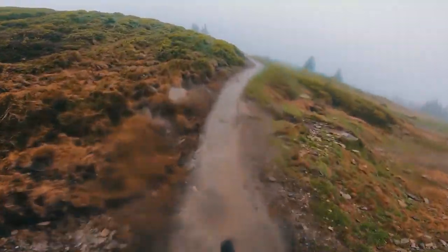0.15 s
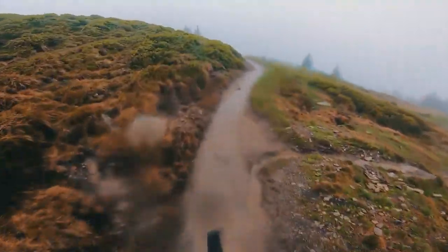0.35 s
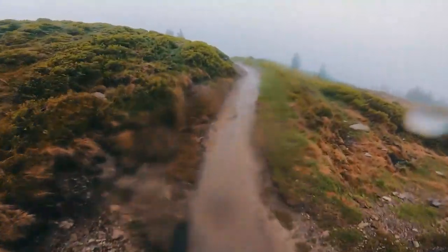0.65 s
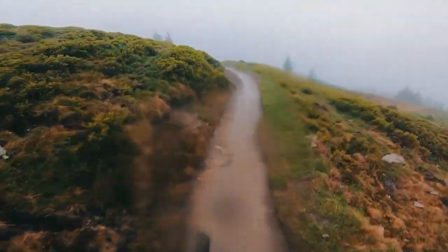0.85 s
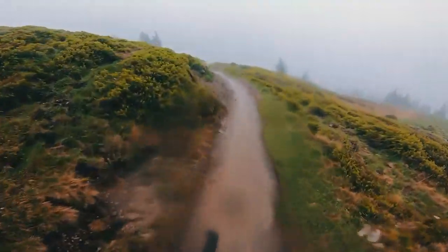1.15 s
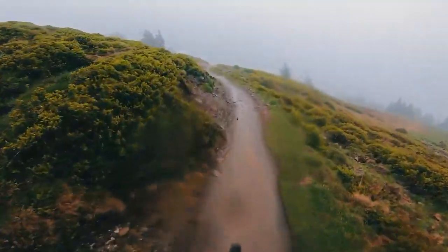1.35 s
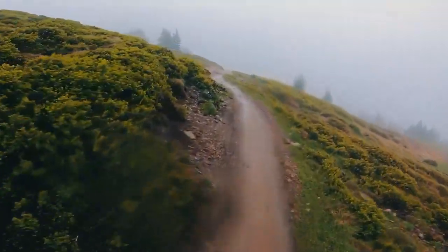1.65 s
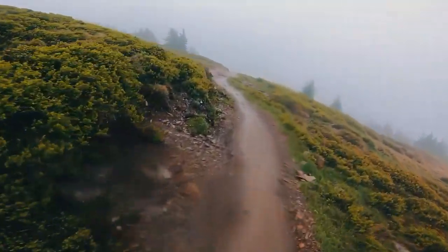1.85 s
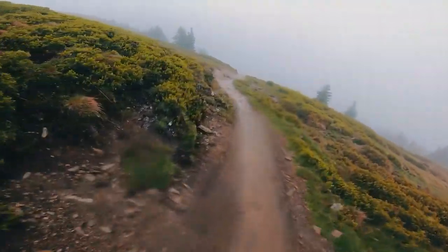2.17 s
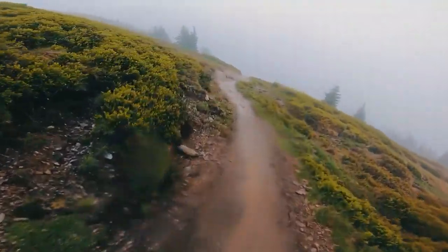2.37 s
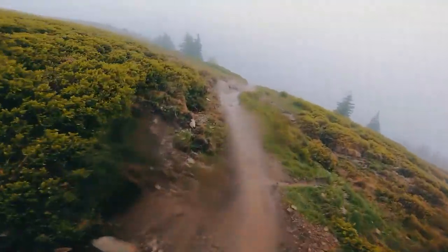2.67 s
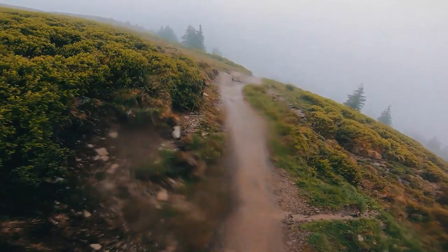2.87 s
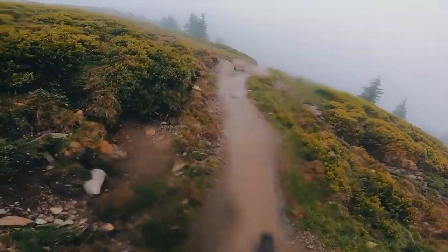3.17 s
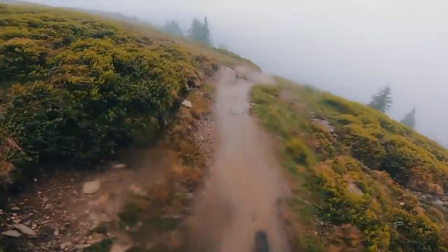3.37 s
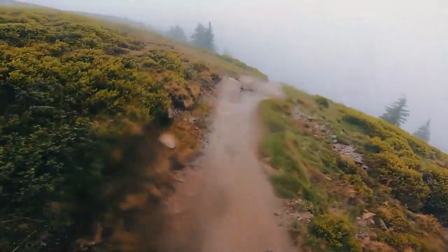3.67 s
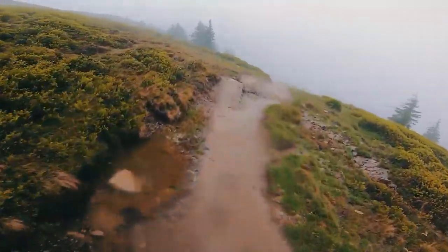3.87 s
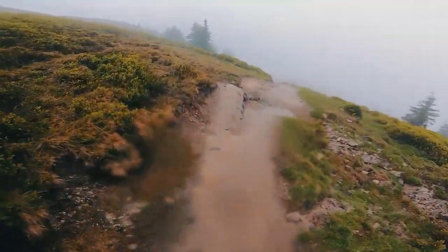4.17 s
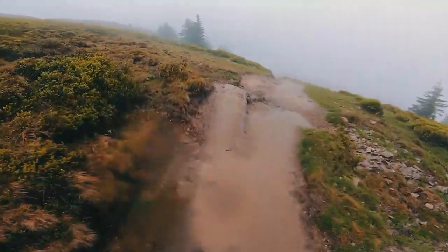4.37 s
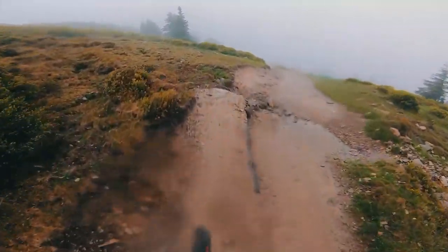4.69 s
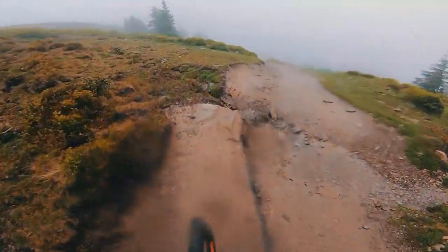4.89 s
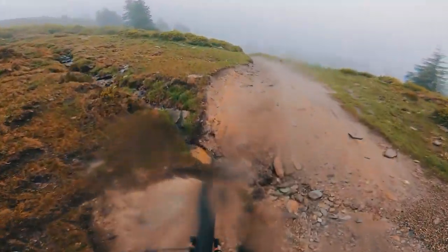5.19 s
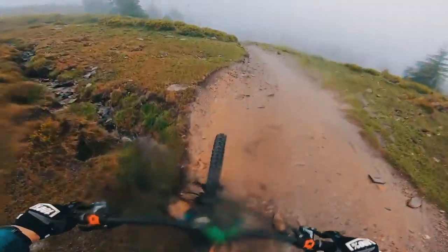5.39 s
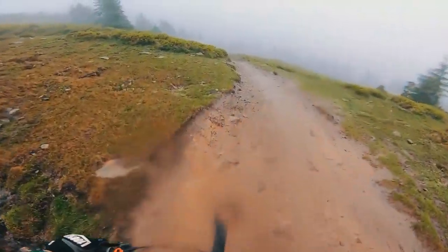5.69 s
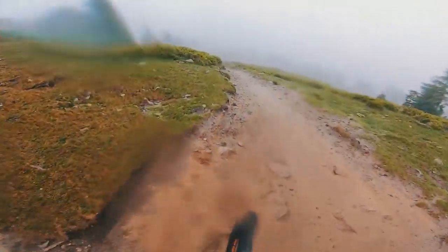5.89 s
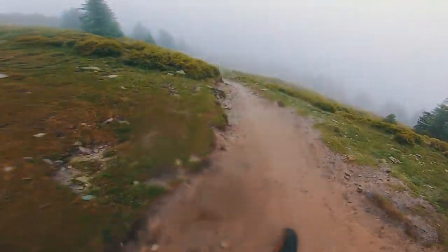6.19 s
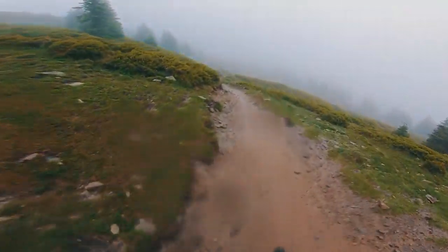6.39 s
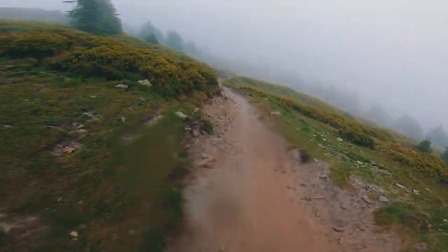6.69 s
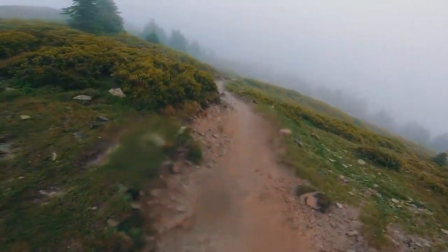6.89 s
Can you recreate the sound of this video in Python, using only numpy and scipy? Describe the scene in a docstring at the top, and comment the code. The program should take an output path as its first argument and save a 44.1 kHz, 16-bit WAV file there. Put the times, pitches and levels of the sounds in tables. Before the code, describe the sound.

A mountain bike coasts down a wet trail, heard from a small microphone riding along. The tyres churn mud loudly at first, then settle into a hiss of spray under gusty wind rumble. Drops and grit tick on the microphone housing throughout. A thin, breathy whistle comes and goes over a faint freewheel whirr. Bumps make the bike thud and knock, most heavily in a cluster near the end.

```python
"""A mountain bike coasts down a wet trail, its tyres churning mud and throwing hissing spray.
Wind buffets the opening of a small microphone in a splash-proof housing. Bumps make the frame
thud and knock, and drops and grit tick on the housing. Behind these are a hollow whistle in
the spray, the whirr of the freewheel and one ping from a spoke. Mud, spray, wind, whistle
and whirr are shaped noise; thuds, ticks and the ping are short, fading tones."""
import sys
import numpy as np
from scipy import signal
from scipy.fft import rfft, irfft, next_fast_len
from scipy.io import wavfile

SR = 44100
rng = np.random.default_rng(int(sys.argv[2]) if len(sys.argv) > 2 else 0)


def waveform_to_disk(signal):
    """Save audio, clipped to [-1, 1], as 16-bit WAV at the path in sys.argv[1]."""
    frames = np.transpose(np.atleast_2d(signal))
    scaled = np.clip(frames, -1, 1) * 32767
    samples = np.round(scaled).astype(np.int16)
    wavfile.write(sys.argv[1], SR, samples)


N = 310905

# Churned mud and thrown water between bumps. Each row: time in seconds, level in dB.
MUD_LEVELS = [(0.0, -26.5), (0.29, -27), (0.32, -35), (0.39, -36), (0.44, -29), (0.59, -24), (0.64, -31),
              (0.76, -43), (1.1, -45), (1.79, -44), (2.81, -50), (3.4, -47.5), (3.93, -52.5), (4.1, -46),
              (4.65, -49.5), (4.85, -41.5), (5.3, -45.5), (5.9, -59.5), (6.36, -46), (7.05, -52.5)]
SPRAY_LEVELS = [(0.0, -38), (0.82, -37.5), (0.9, -41), (1.49, -43), (1.88, -42), (3.3, -40.5), (3.9, -44),
                (4.03, -40.5), (4.15, -42), (4.27, -39), (4.36, -45.5), (4.48, -42), (5.12, -46),
                (5.36, -37), (5.46, -39.5), (5.8, -47.5), (6.05, -36), (6.22, -42.5), (6.36, -40),
                (7.05, -41)]
# The tyre knobs hum on firmer ground. Each row: time of the peak in seconds, level in dB.
TREAD_SWELLS = [(3.75, -39), (3.87, -42.5), (4.13, -36.5)]
# Wind between bumps. Each row: time in seconds, rumble level in dB, flutter level in dB.
WIND_LEVELS = [(0.0, -24, -31.5), (0.25, -22, -31), (0.33, -28, -33), (0.82, -22.5, -34), (0.98, -39, -39),
               (1.08, -37, -38.5), (1.45, -36, -45.5), (1.63, -33, -34), (1.9, -38, -31),
               (2.06, -36, -33.5), (2.32, -31, -37), (3.24, -35.5, -40), (3.96, -41.5, -45.5),
               (4.63, -35, -42), (4.7, -33, -29.5), (4.9, -36, -30.5), (5.1, -30, -30), (5.4, -31, -26),
               (5.46, -32, -42), (5.93, -46, -45), (6.2, -34.5, -36), (7.05, -31, -44)]
# The tone colour of mud, spray and wind. Each row: frequency in Hz, gain in dB.
MUD_SPECTRUM = [(200, -21), (330, 2.5), (500, 5), (680, 1), (900, -3), (1350, -6), (1550, -14), (2200, -45),
                (3000, -54)]
SPRAY_SPECTRUM = [(300, -45), (550, -4), (1000, 2), (1330, 4), (1520, -1), (2100, -0.5), (2750, -4.5),
                  (3050, -12), (3600, -18.5), (4000, -24.5), (5200, -32), (5900, -35), (8000, -46),
                  (10700, -55)]
RUMBLE_SPECTRUM = [(20, 0.5), (40, 0), (66, 0), (110, -7), (200, -27.5), (500, -36.5)]
FLUTTER_SPECTRUM = [(70, -1), (120, 2.5), (200, -2.5), (280, -4), (400, -11.5), (800, -45)]
# The wheel hits a bump. Each row: time of the peak in seconds, rumble, flutter and mud levels in dB,
# fade in dB per second.
BUMP_SWELLS = [(0.139, -34, -38, -26, 253), (0.28, -31, -44, -22.5, 255), (0.85, -37, -41, -34, 260),
               (0.958, -23, -49, -34.5, 303), (1.98, -21.5, -43, -68, 202), (3.34, -30, -34, -60, 103),
               (3.552, -22, -28, -42.5, 163), (4.06, -37, -34, -39.5, 133), (4.26, -28, -30.5, -53, 136),
               (4.478, -33.5, -33, -47, 114), (5.525, -21.5, -26.5, -31, 82), (5.585, -30, -19.5, -30, 410),
               (5.69, -28.5, -30.5, -40, 35), (5.996, -32, -32, -33, 311), (6.66, -23.5, -43, -47, 144)]
# Stones and roots jolt the frame. Each row: start in seconds, level in dB, pitch in Hz.
FRAME_THUDS = [(0.8, -19, 70), (1.14, -19.5, 82), (3.549, -24, 60.3), (4.061, -19.5, 89), (4.68, -26, 89.5),
               (4.736, -23, 68.5), (5.105, -17.5, 185), (5.133, -18, 126), (5.211, -14, 130),
               (5.502, -15, 79), (5.519, -14, 89), (5.564, -15, 97), (5.68, -25, 75), (5.976, -11.5, 59.6),
               (6.171, -20.5, 95)]
# Frame and chain knock. Each row: start in seconds, level in dB, seconds to fade by 60 dB.
FRAME_KNOCKS = [(0.423, -23, 0.055), (0.845, -21, 0.038), (2.036, -17.5, 0.029), (3.333, -19, 0.092),
                (3.453, -17, 0.035), (4.061, -24.5, 0.04), (4.216, -15.5, 0.034), (4.226, -16, 0.06),
                (4.234, -20, 0.062), (4.414, -22, 0.038), (4.797, -24, 0.035), (5.371, -22.5, 0.046),
                (5.378, -12.5, 0.023), (5.387, -20, 0.02), (5.415, -15.5, 0.034), (5.417, -16, 0.034),
                (5.496, -22, 0.043), (5.559, -30, 0.029), (5.878, -13.5, 0.027), (5.97, -19, 0.092),
                (5.991, -17, 0.06), (6.008, -24, 0.047), (6.047, -18, 0.073)]
# The ways the frame rings. Each row: frequency in Hz, width in Hz, gain in dB.
FRAME_RINGS = [(840, 560, 2.5), (1245, 130, 6.5), (1700, 150, -5.5)]
# Drops and grit hit the housing. Each row: start in seconds, level in dB,
# extra dB for the dull ring, extra dB for the sharp ring.
LOUD_DROPS = [(0.0444, -34, -4, -2), (0.0804, -38, -1, -6), (0.132, -35, 11, -1), (0.1835, -46, -2, -2),
              (0.214, -38, 9, -5), (0.2815, -31, 6.5, -3), (0.352, -39, 11, -17), (0.41, -39, 5.2, -10),
              (0.436, -36, -3, 1), (0.542, -39, 3, 4), (0.5586, -37, 6, 0), (0.5861, -37.5, 12, 1),
              (0.645, -36.5, 12.5, -2), (0.708, -32.5, -1, -7), (0.776, -42, -2, 4),
              (0.9212, -38.5, 15, -4), (1.125, -38, 5.2, -6), (1.1373, -32.5, 6, -5),
              (1.3503, -31, 2.5, -15), (1.5389, -39, 4, -2), (1.5785, -42, 13, -10), (1.5932, -23, 1, -0.5),
              (1.8542, -41, 9.5, 7), (1.937, -39, 9, -11), (1.984, -40, -6, -2), (2.0392, -19.5, 0.5, -37),
              (2.06, -32, 0, -14), (2.5413, -33, 10.5, -27), (2.6616, -34, -5, -6), (2.701, -29.5, -4, -14),
              (2.735, -33.5, 2, -15), (2.761, -40, 5, 2), (2.82, -43.5, 14, -13), (2.9724, -42, -2, -3),
              (3.007, -39, 10, -16), (3.0445, -40, 5, -3), (3.2778, -42, 11, -4), (3.3526, -34, 0, -6),
              (3.4532, -32.5, 8, -6), (3.621, -39, -3, -19), (3.7487, -31, 8, -3), (3.909, -35, -1, -10),
              (4.1306, -36.5, 16.5, -1), (4.1737, -36, 7, -12), (4.2184, -37, 1, -4), (4.2348, -39, 5, -4),
              (4.399, -35.5, -1, -15), (4.486, -36, -2, -8), (4.5986, -40, 12, -3),
              (4.6763, -35.5, -8, -5.5), (4.999, -44, 12.5, -15), (5.0334, -41.5, 9, 2),
              (5.096, -42, 0, -16), (5.1584, -50, -2, 3), (5.193, -46, 2, 0), (5.2011, -39, 11, -10),
              (5.373, -30.5, 4, -12), (5.5888, -40, 14.5, -3), (5.781, -42.5, -2, -9), (5.876, -41, 14, -3),
              (5.9285, -39.5, 17, 2), (6.0375, -35, 17, 1), (6.065, -33, 9, -8), (6.1684, -44, 4, -2),
              (6.2234, -40, 11.5, 2), (6.3806, -38, -3, -2), (6.42, -40, 2, -10), (6.5084, -31.5, 7.5, -7),
              (6.6194, -39, 1, -8), (6.676, -38.5, 12.5, -4), (6.6955, -38, 8, 1), (7.0185, -39, 12.5, -19)]
# Small drops. Each row: time in seconds, typical drops per second, typical level in dB.
SMALL_DROPS = [(0, 220, -49.5), (.9, 100, -54), (1.5, 90, -52.5), (3.4, 50, -53), (5.2, 45, -49),
               (7.05, 90, -57)]
# The ways the housing rings. Each row: frequency in Hz, seconds to reach its peak.
HOUSING_RINGS = [(2750, 0.00038), (3650, 0.00051), (4750, 0.0003), (7800, 0.00029)]
# Whistles in the spray. Each row: start in seconds, first and last pitch in Hz, level in dB,
# fade in dB per second (its sign is ignored), extra dB for the upper tone.
WHISTLE_NOTES = [(1.584, 2410, 2440, -41.5, 11, -4), (1.801, 2375, 2400, -44, 29, -4),
                 (2.03, 2390, 2050, -44.5, 17, -1.5), (2.5, 2400, 2580, -52, 3, -13),
                 (3.5, 2120, 1890, -65, -3, -13), (3.98, 1720, 1970, -44, 27, -20),
                 (5.2, 2080, 2370, -50.5, 34, 4), (6.04, 2700, 2570, -50.5, 15, -21),
                 (6.29, 1720, 1740, -41.5, -2, -14), (6.47, 1920, 1890, -44, 32, -18)]
# How loud the freewheel whirrs. Each row: time in seconds, level in dB.
FREEWHEEL_LEVELS = [(0.0, -71), (0.47, -66), (1.16, -73.5), (2.04, -70.5), (3.3, -69), (3.55, -75),
                    (4.04, -70), (4.24, -91), (4.5, -73.5), (5.2, -81), (5.225, -66), (5.45, -66),
                    (5.9, -79), (6.13, -73), (7.05, -73)]
# Where the whirr sits. Each row: frequency in Hz, width in Hz, gain in dB.
FREEWHEEL_BANDS = [(5100, 670, -7.5), (6540, 600, -3.5), (10530, 1460, -7)]
# A spoke rings. The values: start in seconds, pitch in Hz, level in dB, seconds to fade by 60 dB.
SPOKE_PING = (1.599, 5020, -49, .06)


def tyres(gust):
    """Tyre knobs churn the mud and hum faintly; thrown water hisses and splashes at each knock."""
    churn = patchy_noise(MUD_SPECTRUM, lumps_db=2.0, lumps_hz=54, flicker_db=0.7)
    spray = patchy_noise(SPRAY_SPECTRUM, lumps_db=2.0, lumps_hz=88, flicker_db=1.76)
    hum = pitched_noise(rng.standard_normal(N), hz=np.full(N, 249.2), width_hz=20.3)
    knock_s, knock_db, _ = np.transpose(FRAME_KNOCKS)
    splash = swells(knock_s, knock_db - 23, rise_db_per_s=2500, fade_db_per_s=455)
    firm_ground = swells(*np.transpose(TREAD_SWELLS), rise_db_per_s=180, fade_db_per_s=115)
    # hypot adds two gains by their power
    churn_gain = np.hypot(from_db(curves(MUD_LEVELS)[0]), bumps(column=3))
    spray_gain = np.hypot(from_db(curves(SPRAY_LEVELS)[0]), splash)
    hum_gain = np.hypot(from_db(-51.5), firm_ground)
    return gust * churn_gain * churn + spray_gain * spray + hum_gain * hum


def wind():
    """Air swirls over the microphone: a deep rumble and a higher flutter, both swelling at bumps."""
    rumble_db, flutter_db = curves(WIND_LEVELS)
    rumble = patchy_noise(RUMBLE_SPECTRUM, lumps_db=1.0, lumps_hz=73, flicker_db=4.5)
    flutter = patchy_noise(FLUTTER_SPECTRUM, lumps_db=2.0, lumps_hz=46, flicker_db=2.0)
    rumble_gain = np.hypot(from_db(rumble_db), bumps(column=1))
    flutter_gain = np.hypot(from_db(flutter_db), bumps(column=2))
    return rumble_gain * rumble + flutter_gain * flutter


def bumps(column):
    """Each bump briefly lifts the gain of a layer: column 1 is rumble, 2 flutter, 3 mud."""
    columns = np.transpose(BUMP_SWELLS)
    return swells(columns[0], columns[column], rise_db_per_s=207, fade_db_per_s=columns[-1])


def thuds():
    """Each jolt gives the frame one deep push that is gone in about two cycles."""
    t = np.arange(SR // 8) / SR
    out = np.zeros(N + len(t))
    for start_s, level_db, hz in FRAME_THUDS:
        age = hz * t / 0.31  # the push is strongest after 0.31 cycles
        push = age * np.exp(1 - age)
        i = int(start_s * SR)
        out[i:i + len(t)] -= from_db(level_db) * push * np.cos(2 * np.pi * hz * t)
    return out[:N]


def knocks():
    """Each knock is a short, fading clatter of contacts that makes the frame ring."""
    out, t = np.zeros(N), np.arange(SR // 4) / SR
    attack = 1 - np.exp(-t / 0.0011)
    for start_s, level_db, fade_s in FRAME_KNOCKS:
        contacts_db = np.r_[7, 5 * rng.standard_normal(len(t) // 40)]  # uneven, the first one firm
        grit = rng.standard_normal(len(t)) * from_db(contacts_db.repeat(40)[:len(t)])
        clatter = grit * attack * from_db(-60 * t / fade_s)
        strengths = from_db(rng.normal(0, 2.6, len(FRAME_RINGS)))
        ring = sum(strength * from_db(gain_db) * signal.lfilter(*resonance(hz, width_hz), clatter)
                   for strength, (hz, width_hz, gain_db) in zip(strengths, FRAME_RINGS))
        i = int(start_s * SR)
        out[i:i + len(t)] += from_db(level_db) * ring / np.abs(ring).max()
    return muffle(out, above_hz=2300)


def drops():
    """Loud drops hit the housing at set times; small ones land by chance, in flurries."""
    tries_per_s, tick_samples = 300, 300
    count = int(N / SR * tries_per_s)
    when, chance, size, dull, sharp = rng.random((count, 5)).T
    starts_s = when * N / SR
    times_s, per_s, typical_db = np.transpose(SMALL_DROPS)
    small_db = np.interp(starts_s, times_s, typical_db) - 5.5 * np.log(size + .12)
    small = np.c_[starts_s, small_db, 12 * dull - 4, 20 * sharp - 17]
    flurry = wobble(depth_db=3.5, speed_hz=9)[(when * N).astype(int)]
    lands = chance * tries_per_s < np.interp(starts_s, times_s, per_s) * flurry
    out, t = np.zeros(N + tick_samples), np.arange(tick_samples) / SR
    quirks = rng.uniform(-1, 1, (count + len(LOUD_DROPS), 5))
    for (start_s, level_db, dull_db, sharp_db), quirk in zip([*LOUD_DROPS, *small[lands]], quirks):
        i = int(start_s * SR)
        out[i:i + len(t)] += from_db(level_db) * tick(t, dull_db, sharp_db, quirk[0], quirk[1:])
    # the housing swallows one band of treble
    swallowed = signal.lfilter(*resonance(hz=5860, width_hz=630), out + 1e-18)
    return (out - swallowed)[:N]


def tick(t, dull_db, sharp_db, brightness, detunes):
    """One drop rings the housing for a few cycles, each ring off pitch by up to 0.13 octaves."""
    levels_db = [dull_db, -3 - 4 * brightness, sharp_db, -19.5 + 0.9 * sharp_db + 5 * brightness]
    out = 0
    for (hz, peak_s), level_db, detune in zip(HOUSING_RINGS, levels_db, detunes):
        tone = np.sin(2 * np.pi * hz * 2 ** (.13 * detune) * t)
        out += from_db(level_db) * tone * t / peak_s * np.exp(1 - t / peak_s)
    return out


def whistle():
    """Two breathy tones glide together, like water sheeting off the rim or brake."""
    starts_s, first_hz, last_hz, levels_db, fades, upper_db = np.transpose(WHISTLE_NOTES)
    ends_s = np.r_[starts_s[1:] - .03, N / SR]  # each note lasts until the next one rises
    glides = np.c_[np.c_[starts_s, ends_s].ravel(), np.c_[first_hz, last_hz].ravel(), upper_db.repeat(2)]
    hz, share_db = curves(glides)
    t, gain = np.arange(N) / SR, 0
    for start_s, end_s, level_db, fade in zip(starts_s, ends_s, levels_db, fades):
        release = np.clip((end_s - t) / 0.023 + 1, 0, 1)
        gain += swells(start_s, level_db, rise_db_per_s=607, fade_db_per_s=fade) * release
    air = rng.standard_normal((2, N))
    lower = pitched_noise(air[0] * wobble(depth_db=2.1, speed_hz=24), hz, width_hz=185)
    upper = pitched_noise(air[1] * wobble(depth_db=3.9, speed_hz=29), 1.178 * hz, width_hz=430)
    return gain * muffle(lower + from_db(share_db) * upper, above_hz=3300)


def freewheel():
    """The coasting freewheel whirrs: grainy noise in a few high, narrow bands."""
    grain = rng.standard_normal(N) * wobble(depth_db=2.0, speed_hz=60)
    whirr = 0
    for hz, width_hz, gain_db in FREEWHEEL_BANDS:
        band = resonance(hz, width_hz)
        whirr += from_db(gain_db) * signal.lfilter(*band, signal.lfilter(*band, grain))
    return from_db(curves(FREEWHEEL_LEVELS)[0]) * rms_one(whirr)


def spoke():
    """A thrown stone hits a spoke, which gives one thin, short ring."""
    start_s, hz, level_db, fade_s = SPOKE_PING
    t = np.maximum(np.arange(N) / SR - start_s, 0)
    attack = 1 - np.exp(-t / .003)
    return from_db(level_db - 60 * t / fade_s) * attack * np.sin(2 * np.pi * hz * t)


def patchy_noise(spectrum, lumps_db, lumps_hz, flicker_db):
    """Noise in half-octave bands: each flickers alone, and lumps swell them all at once."""
    hz, gain_db = np.transpose(spectrum)
    edges = hz[0] * 2 ** np.arange(-.5, np.log2(hz[-1] / hz[0]) + .5, .5)
    white, out = rng.standard_normal((2, N + SR)), 0
    for k, (low, high) in enumerate(zip(edges, edges[1:])):
        band = signal.butter(2, [low, high], "band", fs=SR, output="sos")
        out += signal.sosfilt(band, white[k % 2])[SR:] * wobble(flicker_db, speed_hz=21)
    out *= wobble(lumps_db, lumps_hz)
    size = next_fast_len(N + SR)
    bins_hz = np.arange(size // 2 + 1) * SR / size
    colour = from_db(np.interp(np.log(bins_hz + 1), np.log(hz), gain_db))
    return rms_one(irfft(rfft(out, size) * colour, size)[:N])


def pitched_noise(noise, hz, width_hz):
    """Give noise a pitch by passing it twice through a resonance that follows hz."""
    out = noise.copy()
    for _ in range(2):
        state = np.zeros(2)
        for i in range(0, N, 512):
            out[i:i + 512], state = signal.lfilter(*resonance(hz[i], width_hz), out[i:i + 512], zi=state)
    return rms_one(out)


def swells(times_s, peaks_db, rise_db_per_s, fade_db_per_s):
    """A gain that climbs to each peak and dies away; overlapping swells add their power."""
    t, power = np.arange(0, N + 32, 32) / SR, 0
    for peak_s, peak_db, fade in np.broadcast(times_s, peaks_db, fade_db_per_s):
        below_db = np.where(t < peak_s, rise_db_per_s * (peak_s - t), abs(fade) * (t - peak_s))
        power += from_db(2 * (peak_db - below_db))
    return np.sqrt(np.interp(np.arange(N) / SR, t, power))


def wobble(depth_db, speed_hz):
    """A gain that wanders at random, typically by depth_db; it is made from smoothed noise."""
    step = 20  # samples per random value
    r = np.exp(-2 * np.pi * step * speed_hz / SR)
    slow = signal.lfilter([1], [1, -2 * r, r * r], rng.standard_normal(N // step + 4002))[4000:]
    return from_db(depth_db * np.interp(np.arange(N) / step, np.arange(len(slow)), rms_one(slow)))


def resonance(hz, width_hz):
    """A filter that lets through one band around hz."""
    r = np.exp(-np.pi * width_hz / SR)
    return (1 - r * r) / 2 * np.array([1, 0, -1]), [1, -2 * r * np.cos(2 * np.pi * hz / SR), r * r]


def muffle(x, above_hz):
    """Turn down the treble."""
    return signal.sosfilt(signal.butter(4, above_hz, fs=SR, output="sos"), x)


def curves(rows):
    """Join a table's points with straight lines, giving one value per sample."""
    times_s, *columns = np.transpose(rows)
    return [np.interp(np.arange(N) / SR, times_s, column) for column in columns]


def from_db(db):
    """Turn decibels into a gain."""
    return 10 ** (np.asarray(db) / 20)


def rms_one(x):
    """Scale a signal to an average power of 1."""
    return x / np.sqrt(np.mean(x ** 2) + 1e-20)


def scene():
    """Add up all the sources at the one microphone."""
    gust = wobble(depth_db=0.5, speed_hz=29)  # gusts shake wind and mud together
    mix = gust * wind() + tyres(gust) + thuds() + whistle() + freewheel() + drops() + spoke() + knocks()
    return mix[None]


def record(dry):
    """The sound fades in over 4 ms and loses its top treble; the microphone adds a faint hiss."""
    treble_cut = signal.cheby2(12, 60, 10850, fs=SR, output="sos")
    fade_in = np.minimum(np.arange(N) / SR / .004, 1) ** 2
    return signal.sosfilt(treble_cut, fade_in * dry) + from_db(-104) * rng.standard_normal(dry.shape)


dry = scene()
out = record(dry)
waveform_to_disk(out)
```